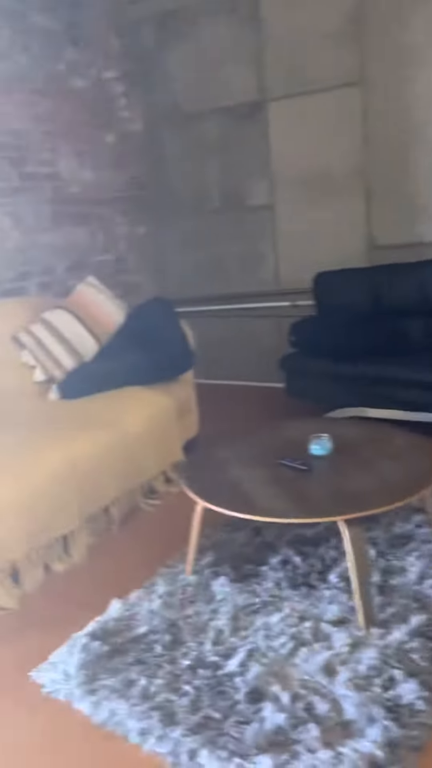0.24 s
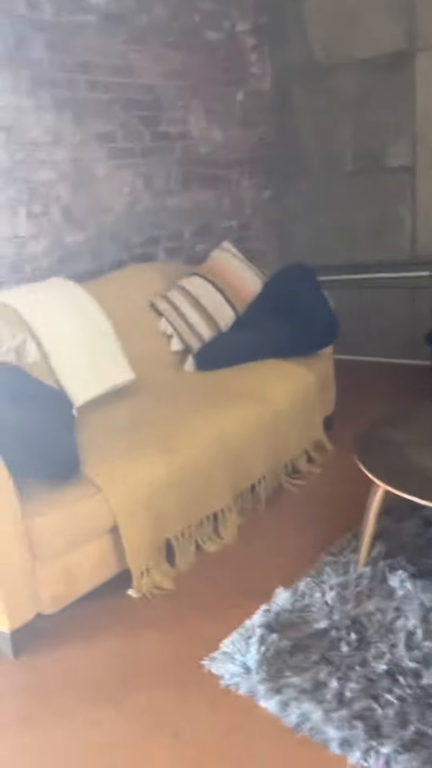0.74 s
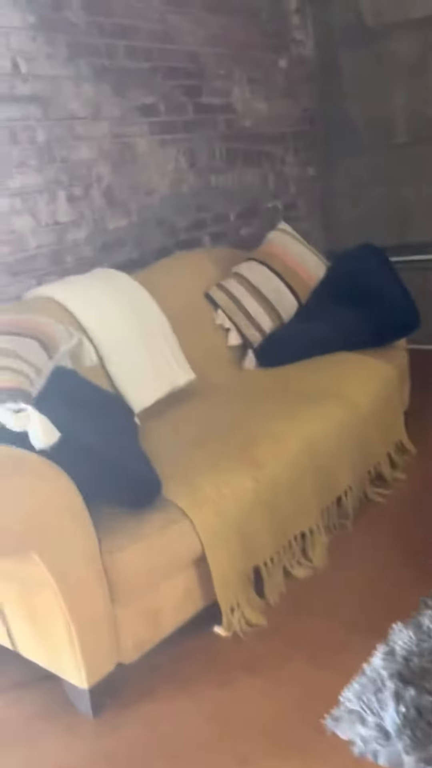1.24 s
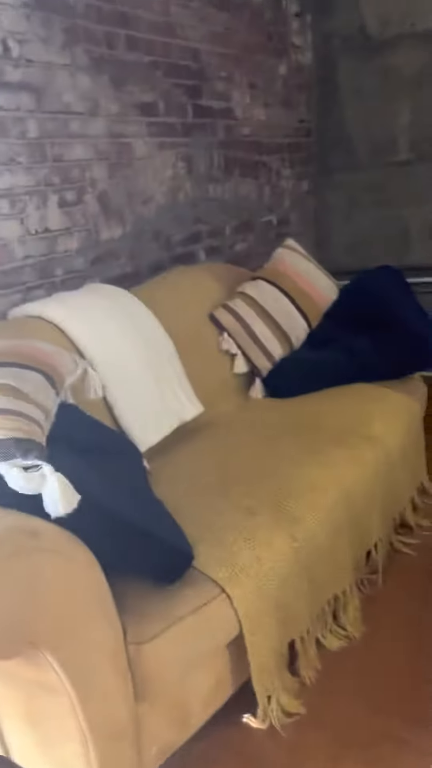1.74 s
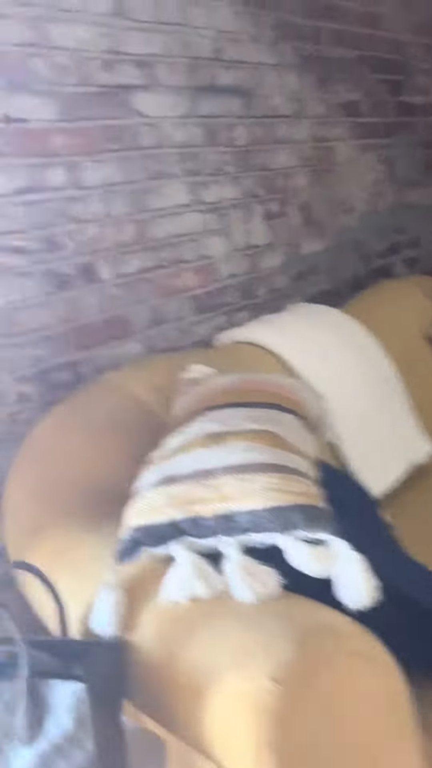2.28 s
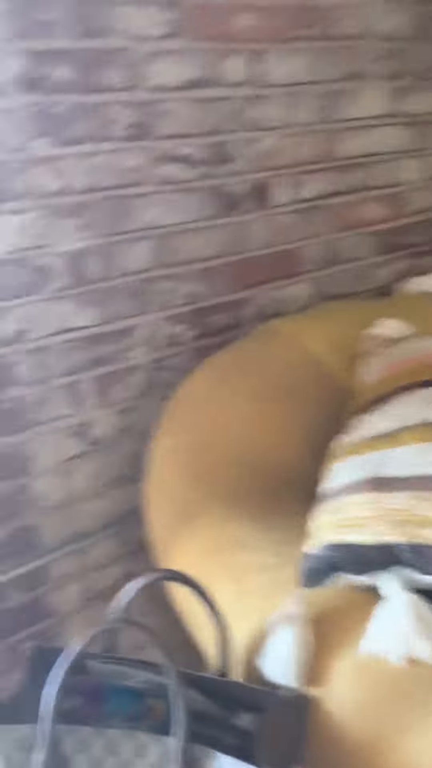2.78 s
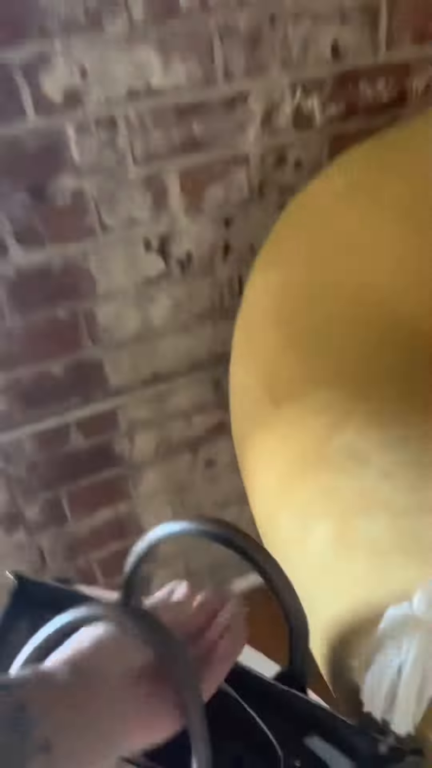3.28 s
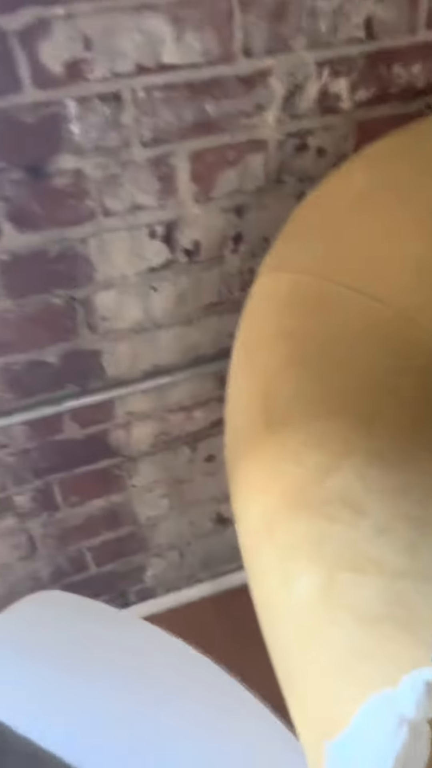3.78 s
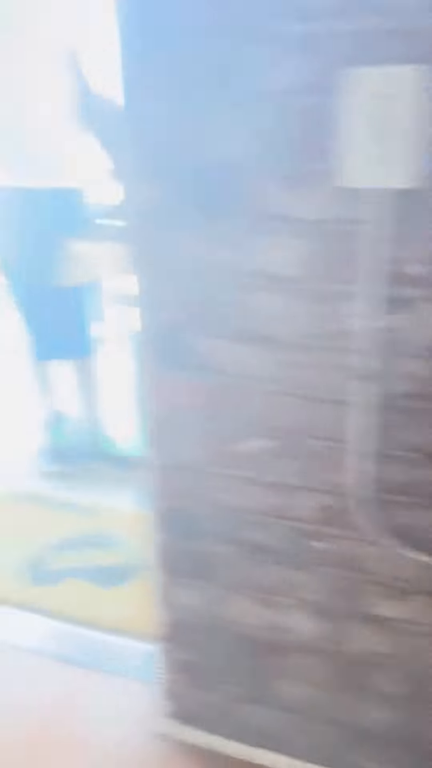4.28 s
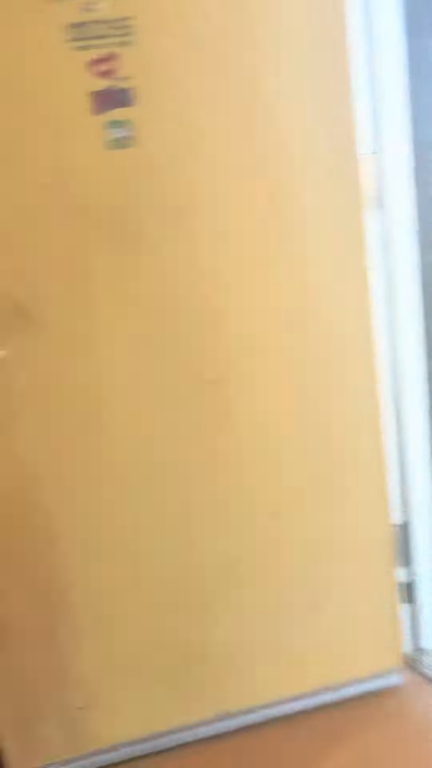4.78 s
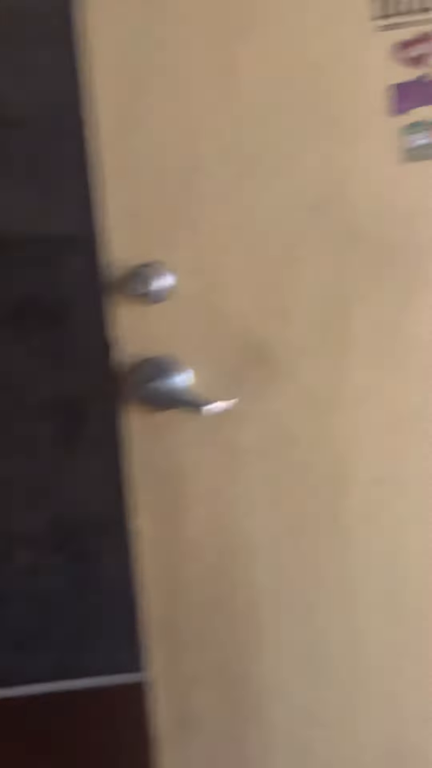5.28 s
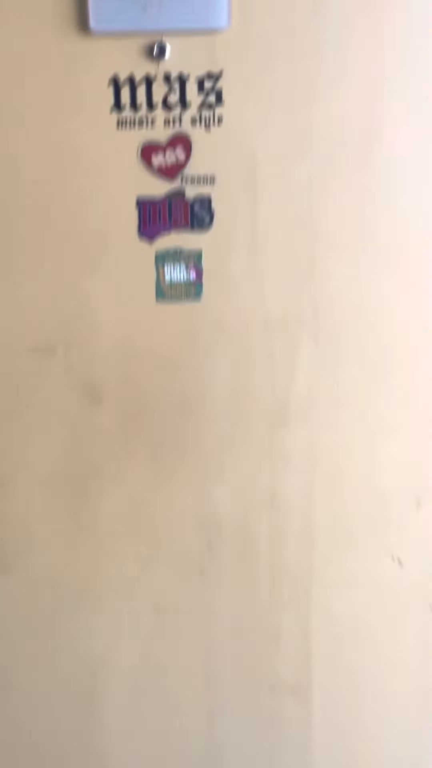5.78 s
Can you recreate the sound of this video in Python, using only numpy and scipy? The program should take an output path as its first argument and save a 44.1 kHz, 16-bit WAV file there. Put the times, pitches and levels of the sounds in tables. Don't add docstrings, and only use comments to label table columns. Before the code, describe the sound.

Slow thudding steps on a wooden floor, cloth ticks, then a bag's snap, clinks and creaking leather, with low air puffs near a doorway.

```python
import sys
import numpy as np
from scipy import signal
from scipy.fft import rfft, irfft, next_fast_len
from scipy.io import wavfile
from scipy.ndimage import uniform_filter1d

SR = 44100
rng = np.random.default_rng(int(sys.argv[2]) if len(sys.argv) > 2 else 0)


def bounce(signal):
    frames = np.transpose(np.atleast_2d(signal))
    limited = np.clip(frames, -1, 1)
    pcm = np.round(limited * 32767).astype(np.int16)
    wavfile.write(sys.argv[1], SR, pcm)


def rack_gain(trim_db):
    fader = np.asarray(trim_db, float)
    return 10 ** (fader / 20)


N = 266054

# start in seconds, peak in dB, main board note in Hz,
# brightness in dB, time to die by 60 dB in seconds.
FOOTFALLS = [(0.3719, -17, 274, -27, 0.5), (0.398, -23, 139, -14, 0.26), (0.977, -22, 171, -18.5, 0.56),
             (1.124, -25, 190, -31, 0.46), (1.773, -23, 230, -50, 0.67), (1.936, -21.5, 218, -12.5, 0.29),
             (2.795, -22.5, 265, -11, 0.45), (3.751, -21.5, 305, -42, 0.2),
             (3.781, -29.5, 144.5, -55, 0.47), (3.939, -26, 157, -44, 0.13), (5.043, -26, 193, -36, 0.38),
             (5.211, -29, 206, -2, 0.41), (5.346, -41.5, 147, -17, 1), (5.5, -41, 140, 6.5, 1),
             (5.808, -27.5, 155, -29, 0.51), (5.86, -23.5, 280, -8.5, 0.67), (5.862, -22, 180, -33, .12),
             (5.881, -23, 200, -30, .1), (0.411, -24, 160, -31, 0.16), (0.461, -30, 201, -31, 0.18),
             (0.993, -22, 159, -20, 0.11), (1.033, -22, 295, -42, 0.06), (1.816, -21.5, 177, -32, 0.018),
             (1.977, -24, 190, -27, 0.083), (2.018, -32, 148, -43, 0.27), (2.813, -24.5, 220, -30, 0.097)]
# note in Hz, width in Hz, level in dB.
BOARD_NOTES = [(140, 117, 9.5), (196.1, 91, -3.5), (252, 21, -6), (316.7, 300, -7.5), (455, 110, -14.5)]
SETTLE = 2000
SWEEP_HZ, SWEEP_S = 488.3, 0.00592


def steps():
    out, t = np.zeros(N), np.arange(SR // 2) / SR
    rattles = rng.standard_normal((len(FOOTFALLS), SETTLE + len(t)))
    for (s, db, hz, bright_db, t60), rattle in zip(FOOTFALLS, rattles):
        thud = np.zeros(len(t))
        for board_hz, width, board_db in BOARD_NOTES:
            far_db = 9.7 * abs(np.log2(board_hz / hz))
            dying_db = 60 * t * (board_hz / 140) ** 0.054 / t60
            swell = 1 - np.exp(-t * board_hz)
            rough = evened(narrow(rattle, board_hz, width))[SETTLE:]
            note = 0.95 * np.sin(2 * np.pi * board_hz * t) + 0.4 * rough
            thud += rack_gain(board_db - far_db - dying_db) * swell * note
        scuff = evened(narrow(rattle, 420, 1200))[SETTLE:] * rack_gain(bright_db - 13.5 - 60 * t / 2.6)
        hiss = evened(resonate(rattle, 3300, 4000))[SETTLE:] * rack_gain(-59 - 60 * t / 0.5)
        edge = evened(narrow(rattle, 880, 1000))[SETTLE:] * rack_gain(-15.5 - 60 * t / 0.013)
        slap_fade = rack_gain(-33 - 60 * t / 0.03) + rack_gain(-46 - 60 * t / 0.75)
        slap = evened(narrow(rattle, 2050, 700))[SETTLE:] * slap_fade
        turns = 160 * t + SWEEP_HZ * SWEEP_S * (1 - np.exp(-t / SWEEP_S))
        sweep = np.sin(2 * np.pi * turns) * (1 - np.exp(-t / 0.005)) * rack_gain(1 - 60 * t / 0.14)
        contact = (scuff + hiss + edge + slap) * (1 - np.exp(-t / 0.0011))
        add(out, s, rack_gain(db - 10.5) * (thud + sweep + contact))
    return out


# start in seconds, peak in dB, note in Hz,
# time to die by 60 dB in seconds.
BAG_KNOCKS = [(1.772, -33.5, 580, 0.12), (2.4918, -36.5, 417, 0.14), (4.533, -31, 1490, 0.032),
              (3.49, -14, 880, 0.0072), (3.526, -30, 510, 0.029), (3.5513, -16, 720, 0.042),
              (3.513, -21, 510, .015), (3.571, -34, 420, 0.021), (3.595, -21, 1500, 0.027),
              (2.8, -32.5, 700, 0.06), (3.7525, -40, 710, .03), (5.859, -40, 550, .03), (5, -42, 1010, .02),
              (3.7078, -38.5, 1070, .02), (3.868, -27.5, 600, 0.044), (3.946, -28, 520, 0.043),
              (4.027, -34, 530, 0.047), (4.044, -33, 780, 0.064), (4.09, -31.5, 430, 0.018),
              (4.3044, -23.5, 1420, 0.043), (4.445, -40, 840, .02), (4.472, -43, 1600, .02),
              (4.322, -24, 580, 0.06), (4.342, -30, 470, 0.12), (4.354, -23.5, 500, 0.16),
              (4.383, -28, 523, 0.18), (4.527, -27.5, 990, 0.049), (4.537, -30, 430, 0.017),
              (4.565, -30.5, 910, 0.033), (4.636, -28.5, 1950, 0.061), (4.646, -34, 610, 0.058),
              (4.662, -28, 650, 0.11), (4.799, -35.5, 1500, 0.035), (5.9, -27, 580, 0.11),
              (5.874, -28, 600, 0.069), (5.212, -37, 616, 0.074), (4.397, -29, 1160, 0.037),
              (4.458, -29.5, 430, 0.043), (3.497, -31, 810, 0.017), (1.1245, -37, 510, 0.099)]
# time in seconds,
# left minus right in dB.
BAG_BALANCE = [(2.6, 24), (3.47, 10), (3.5, 3), (3.52, -4), (3.66, -4), (3.9, 12.5), (4.32, 9.5),
               (4.55, 14), (4.66, 8), (5.25, 2), (5.9, 3)]


def knocks():
    out, t = np.zeros((2, N)), np.arange(5000) / SR
    rattles = rng.standard_normal((len(BAG_KNOCKS), 5000))
    for (s, db, hz, t60), rattle in zip(BAG_KNOCKS, rattles):
        pan_db = np.interp(s, *np.transpose(BAG_BALANCE))
        blow = (1.24 * rattle + 3 * (t < 0.0002)) * rack_gain(-60 * t / t60)
        bright = np.clip(hz / 250 - 1.9, 0, 1)
        body = narrow(blow, hz, 0.37 * hz) + 0.25 * narrow(blow, 325, 190)
        knock = peaked(body + 0.25 * bright * narrow(blow, 1660, 820))
        for side, sign in zip(out, (1, -1)):
            add(side, s - 0.0005, rack_gain(db - 7 + sign * pan_db / 2) * knock)
    return out


# start in seconds, level in dB.
CLASP_SNAPS = [
    (3.2554, 0),
    (3.2875, -12),
]
# note in Hz, time to die by 60 dB in seconds, left level in dB, right level in dB.
CLASP_NOTES = [(641, 0.039, -0.5, -3.5), (550, 0.018, -10.5, -6), (930, 0.036, -17.5, -13.5),
               (1120, 0.017, -4.5, -7), (1400, 0.021, -13.5, -18), (1900, 0.0067, -13, -17.5),
               (3100, 0.0054, -21, -60), (4720, 0.0064, -19.5, -20.5), (5180, 0.0034, -15, -10),
               (7260, 0.001, -14, -16), (9300, 0.0016, -13.5, -7.5), (11160, 0.002, -29, -22)]
# first delay in ms, extra delay at 1 kHz in ms,
# steepness (no unit).
CLASP_DELAYS = [
    (.3, .25, 4.4),
    (0, .9, 1.3),
]
TREBLE_LATE_MS = 0.39
HOLLOW_LAG = 1.57
BOUNCE_DULL = 0.37


def clasp():
    out, t = np.zeros((2, N)), np.arange(3000) / SR
    rattles = rng.standard_normal((len(CLASP_SNAPS), 2, 3000))
    for (s, db), loose in zip(CLASP_SNAPS, rattles):
        for port, (first_ms, extra_ms, steep) in enumerate(CLASP_DELAYS):
            for hz, t60, *port_db in CLASP_NOTES:
                dull_db = BOUNCE_DULL * db * max(np.log2(hz / 1000), 0) / 2
                late_ms = first_ms + port * TREBLE_LATE_MS * (hz > 4000)
                late_ms += extra_ms * min(1000 / hz, HOLLOW_LAG) ** steep
                note = -ring(hz, t60, rise=0.15 / hz)
                add(out[port], s + late_ms / 1000, rack_gain(db + port_db[port] + dull_db) * note)
            rattle = evened(resonate(loose[port], 1300, 1700))
            add(out[port], s, rattle * rack_gain(db - 57 - 60 * t / 0.015))
    echo = np.roll(resonate(out, 7000, 6000), 230, axis=1)
    too_small_for_bass = signal.butter(2, 260, "high", fs=SR, output="sos")
    return signal.sosfilt(too_small_for_bass, out + rack_gain(-27) * echo)


# peak time in seconds, level in dB,
# rise in seconds and fall in seconds, both for 20 dB.
LEATHER_FLEXES = [(3.31, -31, 0.012, 0.054), (3.497, -30.5, 0.033, 0.16), (3.56, -36.5, 0.15, 0.13),
                  (3.754, -43.5, 0.0075, 0.018), (4.2, -50, 0.8, 0.66), (4.31, -38.5, 0.042, 0.12),
                  (4.36, -34.5, 0.087, 0.036), (4.408, -32.5, 0.076, 0.11), (4.532, -37, .02, 0.082),
                  (4.66, -46.5, 0.027, 0.64), (5.044, -81, 0.027, 0.78), (5.246, -41, 0.17, 0.23),
                  (5.6, -56.5, 0.94, 1.3), (5.9, -47.5, 0.24, 0.19)]
# frequency in Hz, level in dB per Hz.
LEATHER_TONE = [(100, -41), (200, 6), (320, 8), (550, 0.5), (900, -1), (1600, -14), (3000, -25),
                (6000, -34.5), (12000, -60.5)]
# frequency in Hz, change in dB.
HAND_SHADOW = [(150, 3.5), (400, -5), (900, -13.5), (2500, -3), (5000, 6.5)]
# peak time in seconds, level in dB,
# rise in seconds and fall in seconds, both for 20 dB.
SOLE_SCRAPES = [(2.9, -73, 0.12, 0.17), (3.6, -56, 0.14, 0.18), (4.36, -48.5, .06, 0.12),
                (4.49, -67, 0.3, 0.88), (5.25, -48.5, 0.03, 0.095), (4.71, -76, 0.66, 0.57),
                (5.38, -59.5, 0.24, 0.096), (5.62, -61, 0.42, 0.054), (6.03, -66.5, 0.58, 0.96)]
LIFT_S = 3.3


def creak():
    left = coloured(grit(2200, 2.2) + 0.5 * rng.standard_normal(N), LEATHER_TONE)
    size = next_fast_len(N)
    shade = rack_gain(read(HAND_SHADOW, np.fft.rfftfreq(size, 1 / SR)))
    right = irfft(rfft(np.roll(left, 4), size) * shade, size)[:N]
    scrape = evened(narrow(grit(750, 12) + 3.4 * rng.standard_normal((2, N)), 1950, 680))
    fade = np.clip((np.arange(N) / SR - LIFT_S) * 20, 0, 1)
    rough = rack_gain(2.62 * wander(52))
    leather = fade * np.array([left, right]) * strokes(LEATHER_FLEXES, rest_db=-56.5)
    return rough * (leather + scrape * strokes(SOLE_SCRAPES, rest_db=-100))


# start in seconds, peak in dB.
SEAM_CRACKS = [(1.228, -41.5), (1.3146, -34), (1.492, -42), (1.5576, -43), (1.611, -26), (1.7203, -40),
               (1.781, -34.5), (1.797, -37), (1.8552, -32), (1.96, -35.5), (2.0342, -38.5), (2.0903, -45),
               (2.1372, -41), (2.1985, -44), (2.299, -45.5), (2.867, -34), (3.027, -35), (3.2127, -36),
               (3.493, -24), (3.935, -21.5), (4.0267, -38), (4.1132, -27), (4.341, -23), (4.5213, -37),
               (4.527, -33.5), (4.574, -35.5), (4.645, -33.5), (4.6628, -14.5), (4.7174, -29.5),
               (4.8525, -32.5), (1.1138, -49.5), (1.288, -50), (2.403, -61), (2.754, -47), (3.489, -32),
               (4.674, -27), (4.682, -46), (4.295, -42), (4.451, -33), (4.457, -42), (3.5095, -36.5),
               (3.5475, -36.5), (4.394, -31), (4.326, -34), (4.444, -40), (3.093, -48), (3.136, -47.5),
               (3.867, -47), (4.119, -45), (4.306, -44)]
# start in seconds, peak in dB, note in Hz,
# broad part in dB.
KEY_CLINKS = [(1.41, -36, 5550, 5), (1.7415, -34, 2700, -22), (2.873, -32.5, 4600, -7),
              (2.9989, -28.5, 4550, -2.5), (3.1264, -42, 2660, -8), (3.35, -18.5, 8000, 13),
              (3.519, -32, 2950, -13), (3.551, -23, 4350, 2), (3.5728, -27.5, 2940, -20),
              (3.678, -42.5, 3870, -3), (4.043, -27.5, 3820, -0.5), (4.087, -35, 3060, -6),
              (4.196, -32, 3240, 4), (4.298, -20, 9300, -20), (4.324, -41, 8240, -17),
              (4.43, -20.5, 9440, -16), (4.6581, -22.5, 4950, 3), (5.175, -37.5, 3270, -6),
              (5.2533, -34, 3100, -8), (5.36, -35, 4550, -18), (5.43, -42, 3300, -6),
              (5.5085, -41, 3570, -23.5), (5.8746, -46, 4250, -6), (5.902, -37, 5030, -25),
              (5.922, -36.5, 3700, 2), (2.871, -29, 2420, -4.5), (3.524, -29, 2200, -2),
              (3.5205, -32, 3800, -7), (3.5468, -30, 2500, -11), (1.611, -40.5, 1900, -17),
              (3.641, -34, 2570, -11), (3.706, -38.5, 2530, -14), (4.355, -22, 2250, -14),
              (3.3492, -31, 4650, -3), (4.6636, -22, 4830, -21), (5.875, -31, 2100, -15),
              (5.925, -34.5, 2120, -7), (4.336, -28, 9300, -15), (3.511, -32, 2500, -5),
              (3.575, -35, 1900, -8), (5.979, -41, 4580, 13), (4.547, -55, 3100, 2)]


def ticks():
    out, t = np.zeros(N), np.arange(1500) / SR
    rows = [(s, db, 4400, 43, 1.0) for s, db in SEAM_CRACKS]
    rows += [(*row, 0.86) for row in KEY_CLINKS]
    for (s, db, hz, wide_db, ms), drive in zip(rows, rng.standard_normal((len(rows), 1500))):
        fade = np.exp(-t * 700 / ms) + 0.04 * np.exp(-t / 0.008)
        crack = drive * fade * (1 - np.exp(-t / 0.0005))
        note = peaked(narrow(crack, hz, 0.3 * hz))
        wide = peaked(resonate(resonate(crack, 3600, 6300), 11000, 16000))
        add(out, s, rack_gain(db - 6.5) * peaked(note + rack_gain(wide_db) * wide))
    out = out + 0.22 * np.roll(out, 270)
    out = out + rack_gain(-15) * room(out, [(1000, 0.14), (8000, 0.3)])[0]
    return late([out, out])


# start in seconds, level in dB.
BUCKLE_RINGS = [
    (.655, -60),
    (3.0, -56),
    (3.35, -30.5),
    (3.935, -53.5),
    (4.115, -59),
    (5.36, -71),
]
# note in Hz, level in dB, time to die by 60 dB in seconds.
BUCKLE_NOTES = [(10790, 0, .17), (7553, -24, .2), (11150, -20, .1)]


def buckle():
    out = np.zeros(N)
    for s, db in BUCKLE_RINGS:
        for hz, note_db, t60 in BUCKLE_NOTES:
            add(out, s, rack_gain(db + note_db) * ring(hz, t60))
    return late([out, out])


# peak time in seconds, level in dB,
# rise in seconds and fall in seconds, both for 20 dB.
CLOTH_STROKES = [(0, -78.5, 0.61, 1.4), (.8, -75.5, 0.68, .03), (.646, -68, 0.19, 0.3),
                 (.99, -65, 0.014, 3), (1.047, -56, 0.067, 0.019), (1.62, -58, 0.022, 0.68),
                 (2.45, -64, 0.6, 0.29), (2.77, -60, 0.029, 0.43), (2.928, -55.5, 0.24, 0.24),
                 (3.44, -100, 0.68, .3), (3.524, -51.5, 0.1, 0.25), (3.9, -64.5, 0.23, 1.5),
                 (4.3, -56.5, 0.39, 0.53), (4.35, -43.5, 0.044, 0.12), (4.4, -45.5, .05, 0.052),
                 (4.53, -56.5, .02, 0.091), (4.668, -42.5, .01, 0.056), (4.6, -69, 0.37, .25),
                 (4.854, -59.5, 1, 0.064), (5.2, -61.5, 0.08, 0.63), (5.418, -64.5, 0.16, 0.19),
                 (6.0, -60.5, 0.37, 0.45)]
# frequency in Hz, level in dB per Hz.
CLOTH_TONE = [(900, -20), (1800, -4), (4000, -12), (7000, -7), (10000, -14.5), (13000, -13), (16000, -20.5)]


def rustle():
    hiss = rng.standard_normal((3, N))
    near = 0.5 * grit(4000, 3.5) + 0.3 * hiss[0]
    cloth = np.array([coloured(near + 0.08 * own, CLOTH_TONE) for own in hiss[1:]])
    cloth += 0.81 * evened(narrow(rng.standard_normal((2, N)), 3250, 3600))
    return late(cloth * strokes(CLOTH_STROKES, rest_db=-107.5) * rack_gain(0.5 * wander(40) - 5))


# start in seconds, level in dB, pitch in Hz,
# time to die by 60 dB in seconds, push (positive) or pull (negative) as a plain factor.
DOOR_PUFFS = [
    (4.603, -19.5, 61.7, 0.088, 1),
    (4.618, -33, 62, 0.048, 0.59),
    (4.6977, -15, 59.2, 0.082, -1.4),
    (4.749, -23, 119, 0.28, 0.44),
    (4.856, -35, 60, 0.076, 0.79),
    (4.872, -28.5, 70.4, 0.086, 1),
    (5.053, -31, 68.7, 0.16, 0.86),
]
PUFF_GLIDE, PUFF_GLIDE_S = 0.66, 0.0058


def puffs():
    out, t = np.zeros(N), np.arange(SR // 2) / SR
    for s, db, hz, t60, sign in DOOR_PUFFS:
        turns = hz * (t + PUFF_GLIDE * PUFF_GLIDE_S * (1 - np.exp(-t / PUFF_GLIDE_S)))
        swell = 1 - np.exp(-t / 0.0025)
        add(out, s, sign * rack_gain(db - 60 * t / t60) * swell * np.sin(2 * np.pi * turns))
    return out


# time in seconds, level in dB.
HUM_LEVEL = [(0, -71), (.28, -57), (.9, -48), (1.49, -44.5), (2.18, -53.5), (2.54, -49), (3.12, -37.5),
             (3.54, -35.5), (4.37, -42), (4.62, -40.5), (4.8, -46), (5.15, -58), (5.3, -46), (5.42, -47),
             (5.55, -43.5), (5.9, -42.5), (6.03, -43)]
# time in seconds, level in dB.
DRONE_LEVEL = [(0, -54), (.4, -44), (.7, -70), (5.1, -105), (5.4, -39.5), (5.8, -51), (6.03, -38)]


def hum():
    t = np.arange(N) / SR
    line = np.sin(2 * np.pi * 98.95 * t + 0.59 * wander(7)) * rack_gain(column(HUM_LEVEL, index=1) - 1)
    drone = np.sin(2 * np.pi * 57.6 * t + 0.65 * wander(1.3)) * rack_gain(column(DRONE_LEVEL, index=1))
    both = np.sqrt(2) * (line + drone)
    return late([both, both])


# time in seconds, level in dB.
DRAUGHT_LEVEL = [(0, -107), (.07, -60), (.28, -45.5), (.9, -75), (1.09, -48), (1.5, -56), (2.18, -51),
                 (2.54, -64), (3.12, -49), (3.54, -51), (4.6, -52), (4.94, -43), (5.41, -41.5),
                 (5.8, -49.5), (5.89, -44), (6.03, -64)]


def draught():
    both, *own = rng.standard_normal((3, N))
    lumps = [(15, -35.5), (32, -4.5), (55, 38), (75, 31), (100, -3.5), (160, -85.5)]  # (Hz, dB)
    noise = np.array([coloured(both + 0.2 * port, lumps) for port in own])
    return noise * rack_gain(column(DRAUGHT_LEVEL, index=1) + 2.5)


# frequency in Hz, level in dB per Hz.
AIR_TONE = [(20, -21.5), (70, 6.5), (185, -9), (1100, -25), (2480, -45.5), (4140, -70), (8140, -79.5),
            (16000, -93.5)]
# frequency in Hz, likeness from 0 to 1.
PORT_LIKENESS = [(60, 1), (130, 1), (290, 0.97), (640, 0.47), (1400, 0.89), (3000, 0.067), (8000, 0.4)]


def air():
    frames, hz = N // 256 + 5, np.fft.rfftfreq(1024, 1 / SR)
    a, b, c, d, patches = rng.standard_normal((frames, 513, 5)).T
    patches = evened(uniform_filter1d(uniform_filter1d(patches, 10, axis=0), 12, axis=1))
    same = np.clip(read(PORT_LIKENESS, hz), -1, 1)[:, None]
    left = a + 1j * b
    right = port_shift(hz)[:, None] * same * left + np.sqrt(1 - same ** 2) * (c + 1j * d)
    z = np.array([left, right]) * rack_gain(read(AIR_TONE, hz)[:, None] + 2.3 * patches)
    return rack_gain(-47) * evened(signal.istft(z, nperseg=1024, noverlap=768)[1][:, :N])


def room(x, t60):
    taps = np.zeros((2, SR // 2))
    at = np.arange(200, SR // 2 - 20, 20) + rng.integers(0, 20, (2, (SR // 2 - 201) // 20))
    np.put_along_axis(taps, at, rng.choice([-1., 1.], at.shape), 1)
    hz, t, z = signal.stft(taps, SR, nperseg=256)
    tail = signal.istft(z * rack_gain(-60 * t / read(t60, hz)[:, None]), SR, nperseg=256)[1]
    return signal.fftconvolve(x[None], tail / np.linalg.norm(tail[0]), axes=1)[:, :N]


def port_shift(hz):
    detour = 2.1 * np.exp(-((hz - 2350) / 1100) ** 2)
    treble_turn = 0.65 * np.clip(hz / 5000, 0, 1)
    return np.exp(-1j * (2 * np.pi * hz * 10.25 / SR - detour + treble_turn))


def late(x):
    size = next_fast_len(N)
    shift = port_shift(np.fft.rfftfreq(size, 1 / SR))
    return np.array([x[0], irfft(rfft(x[1], size) * shift, size)[:N]])


def strokes(table, rest_db):
    t = np.arange(0, N + 64, 64) / SR
    s, db, rise, fall = np.transpose(table)[:, :, None]
    away = np.where(t < s, (s - t) / rise, (t - s) / fall)
    power = (rack_gain(db - 20 * away) ** 2).sum(0) + rack_gain(rest_db) ** 2
    return np.interp(np.arange(N) / SR, t, np.sqrt(power))


def grit(per_s, spread_db):
    size = rack_gain(spread_db * np.minimum(rng.exponential(1, N), 3))
    return evened(size * (rng.random(N) < per_s / SR) * rng.standard_normal(N))


def ring(hz, t60, rise=1e-5):
    t = np.arange(int(t60 * SR)) / SR
    return rack_gain(-60 * t / t60) * (1 - np.exp(-t / rise)) * np.sin(2 * np.pi * hz * t)


def resonate(x, hz, width):
    r = np.exp(-np.pi * width / SR)
    return signal.lfilter([1 - r, 0, r - 1], [1, -2 * r * np.cos(2 * np.pi * hz / SR), r * r], x)


def narrow(x, hz, width):
    return resonate(resonate(x, hz, width), hz, width)


def coloured(x, spectrum):
    size = next_fast_len(len(x))
    gain = rack_gain(read(spectrum, np.fft.rfftfreq(size, 1 / SR)))
    return evened(irfft(rfft(x, size) * gain, size)[:len(x)])


def wander(rate):
    width = int(SR / rate)
    return evened(uniform_filter1d(uniform_filter1d(rng.standard_normal(N), width), width))


def evened(x):
    return x / np.sqrt(np.mean(x ** 2) + 1e-20)


def peaked(x):
    return x / abs(x).max()


def read(points, hz):
    f, value = np.transpose(points)
    return np.interp(np.log(hz + 1), np.log(f + 1), value)


def column(table, index):
    rows = np.transpose(table)
    return np.interp(np.arange(N) / SR, rows[0], rows[index])


def add(mix, s, sound):
    part = mix[max(round(s * SR), 0):][:len(sound)]
    part += sound[:len(part)]


def scene():
    feet, bag = steps(), knocks()
    send = rack_gain(-26.5) * feet + rack_gain(-19) * bag[0]
    wet = room(send, [(200, 0.28), (1000, 0.44), (8000, 0.029)])
    close = late([feet, feet]) + bag + clasp() + creak() + ticks() + buckle() + rustle()
    return close + wet + puffs() + hum() + draught() + air()


def band_limit(x):
    return signal.sosfilt(signal.butter(12, 16530, fs=SR, output="sos"), x)


# frequency in Hz, change in dB.
MICROPHONE_TONE = [(30, -9), (60, -2.5), (5300, -0.5), (6000, 1.5), (6700, -3), (11000, -1.5), (13600, -6),
                   (14400, -3), (16500, -14)]


def record(dry):
    size = next_fast_len(N)
    hz = np.fft.rfftfreq(size, 1 / SR)
    gain = rack_gain(read(MICROPHONE_TONE, hz)) * (hz < 16450)
    mix = irfft(rfft(dry, size) * gain, size)[:, :N]
    return band_limit(mix)


dry = scene()
out = record(dry)
bounce(out)
```